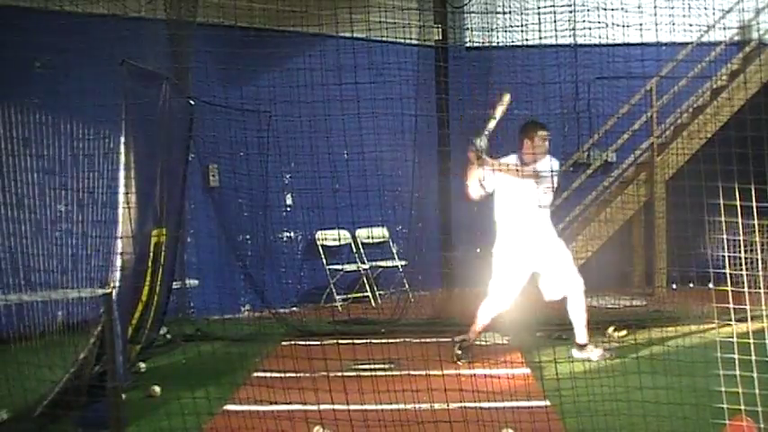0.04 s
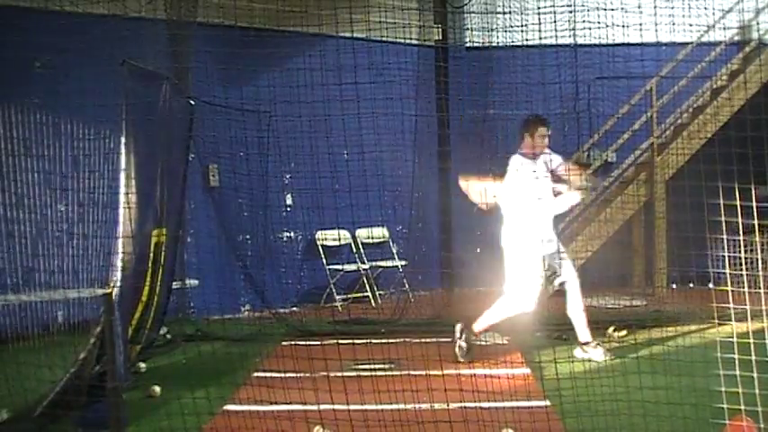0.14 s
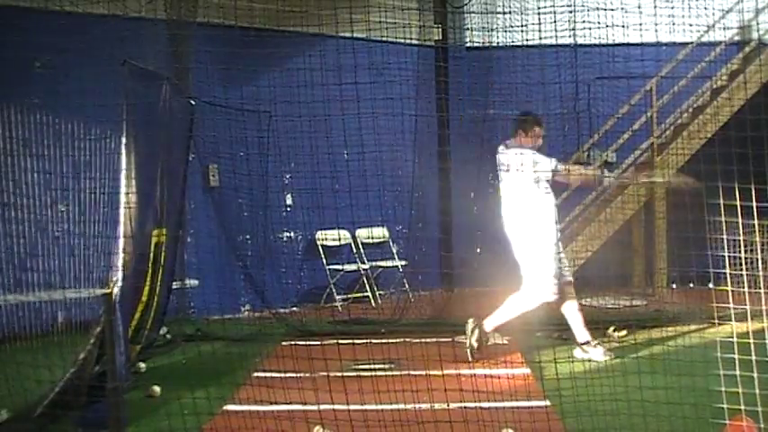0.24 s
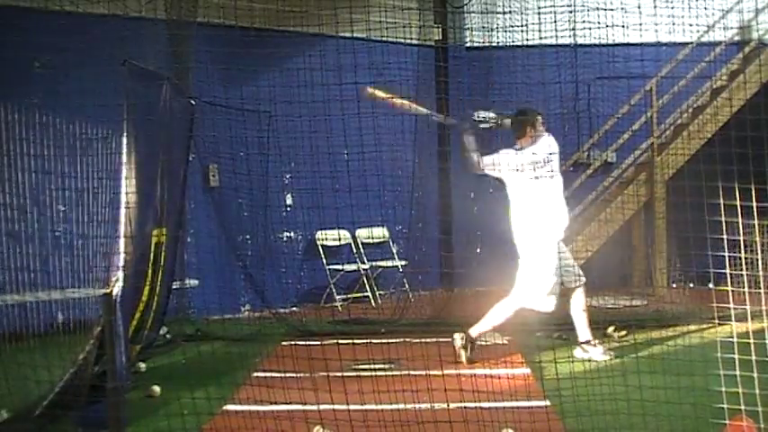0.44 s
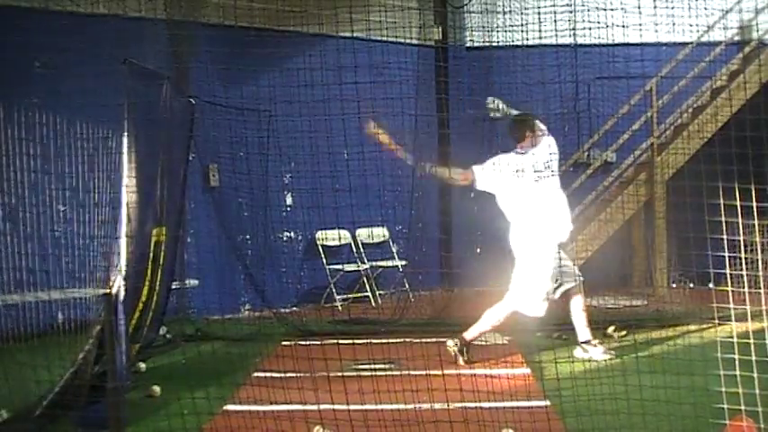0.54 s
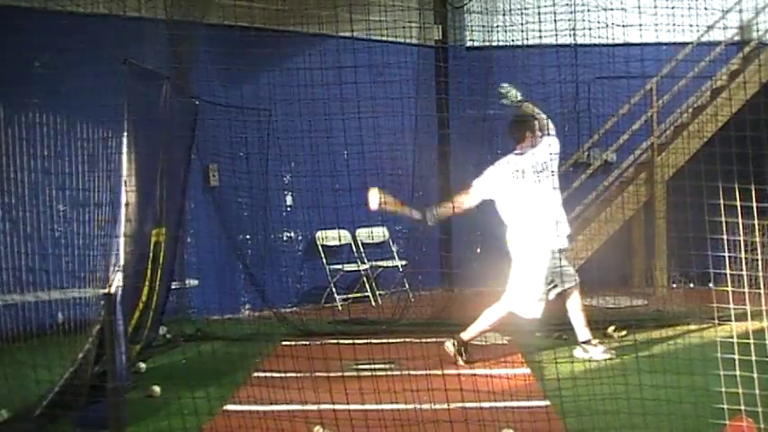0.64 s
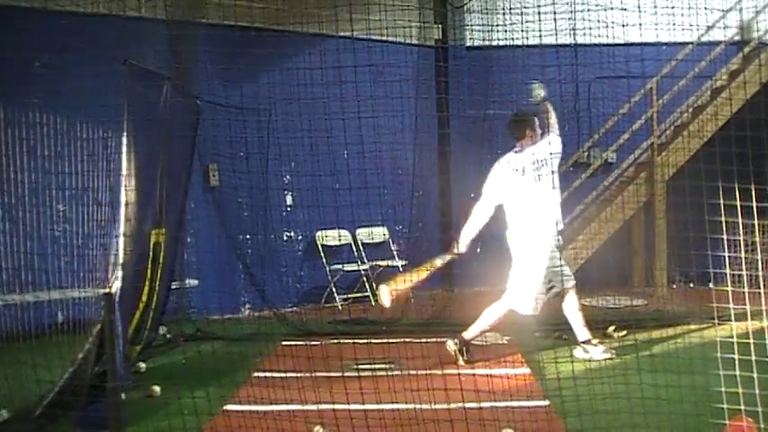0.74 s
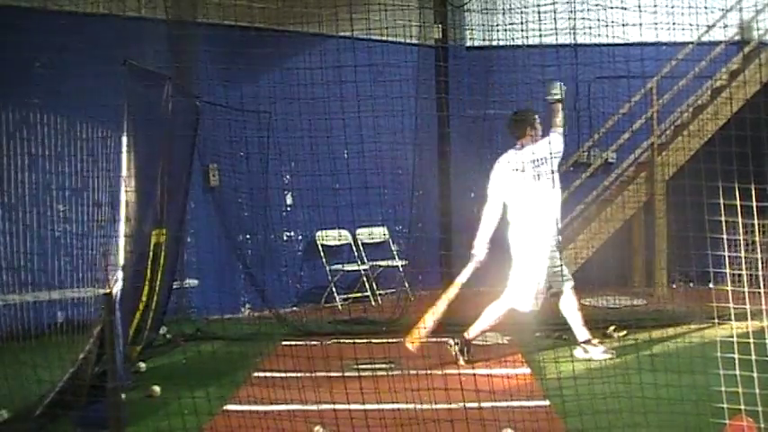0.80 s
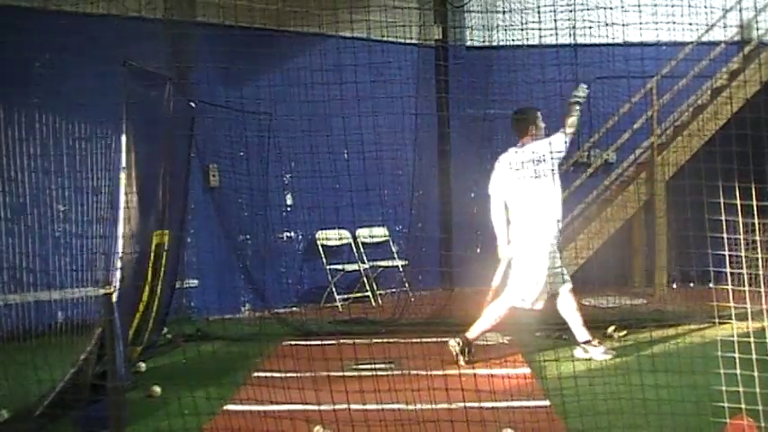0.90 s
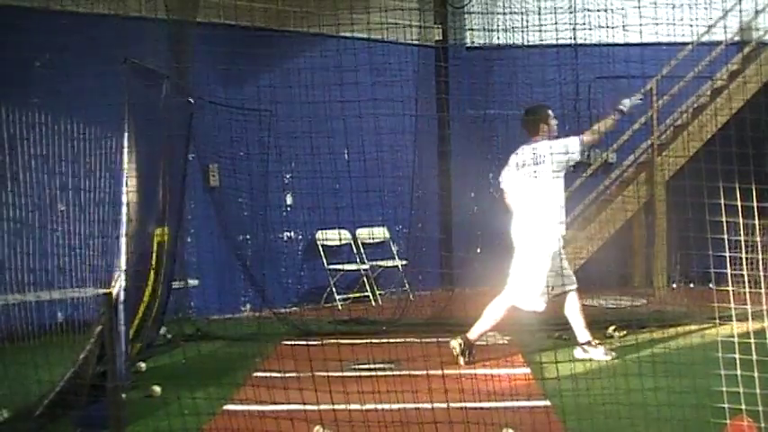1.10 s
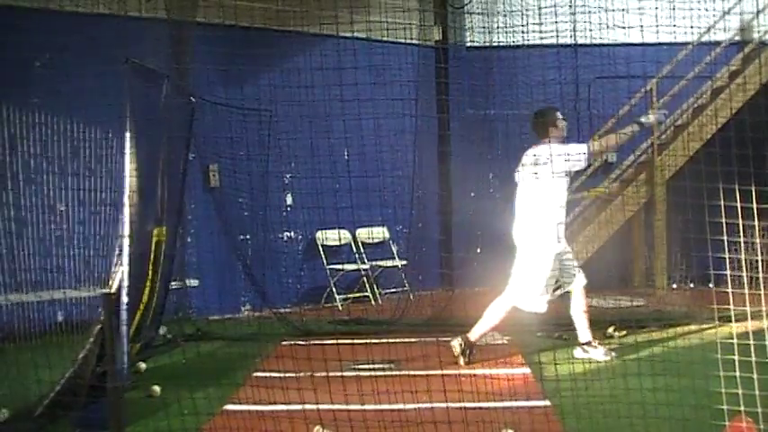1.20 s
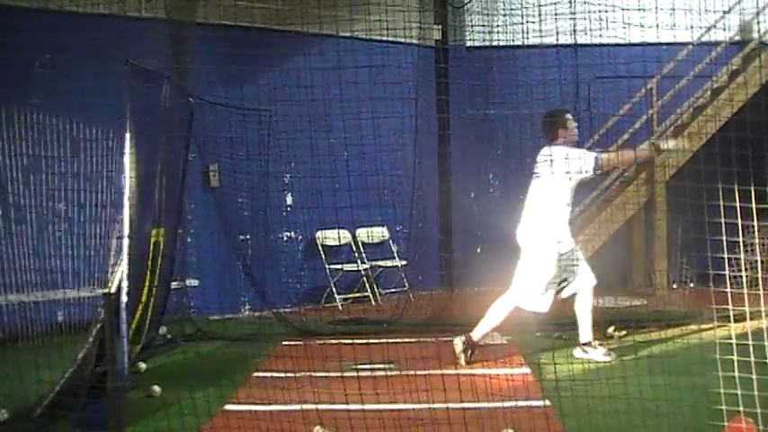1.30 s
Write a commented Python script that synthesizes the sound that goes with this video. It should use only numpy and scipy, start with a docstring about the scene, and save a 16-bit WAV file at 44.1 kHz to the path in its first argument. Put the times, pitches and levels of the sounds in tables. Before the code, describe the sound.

A wooden bat cracks on a ball at about 0.2 s, after a quick swish over faint motor hum and soft hiss. The crack is dry, loud and distorted, with a short low thump and quick close echoes. The hard hall's echo is held up as a long, slowly fading hiss. Near 0.9 s comes a dull, ringing distant thud with light grainy scuffs, then a faint high jingle around 1.1-1.2 s.

```python
"""A large hard hall, one microphone: a faint motor hum over soft hiss, then a bat's swish, shaped noise.
A wooden bat cracks on a ball in a netted cage: damped modes, a low thump, echoes, noise scattered close by.
The crack clips the recorder and ducks its gain; as the gain creeps back it holds the hall's decaying
noise up as a long hiss. Later come a distant ringing thud made of resonant noise, a few light grainy scuffs,
probably shoes on the mat, and a faint jingle of narrow, high noise bands."""
import sys
import numpy as np
from scipy import signal
from scipy.fft import rfft, irfft
from scipy.io import wavfile
from scipy.ndimage import uniform_filter1d

SR = 44100
rng = np.random.default_rng(int(sys.argv[2]) if len(sys.argv) > 2 else 0)


def output_pcm(signal):
    """Save a mono or channel-first signal as 16-bit PCM at the path in sys.argv[1].

    Samples are clipped to [-1, 1] before scaling.
    """
    pcm = np.clip(np.atleast_2d(signal).T, -1, 1) * 32767
    wavfile.write(sys.argv[1], SR, np.round(pcm).astype(np.int16))


N = 59535  # length in samples
HIT_S = .20735  # the moment bat meets ball


def undb(db):
    """Amplitude factor for a level in dB."""
    return 10 ** (np.asarray(db) / 20)


def clock():
    """Time of every sample, s."""
    return np.arange(N) / SR


def bins():
    """Frequency of every spectral bin, Hz, kept above zero for the logarithms."""
    return np.maximum(np.arange(N // 2 + 1) * SR / N, 1)


def along(table, hz):
    """Read a (Hz, value) table on a log-frequency axis."""
    table_hz, values = np.array(table).T
    return np.interp(np.log(hz), np.log(table_hz), values)


def noise(gain):
    """Random-phase noise of rms 1 with the given gain per bin."""
    phases = np.exp(2j * np.pi * rng.random(N // 2 + 1))
    x = irfft(gain * phases, N)
    return x / x.std()


def tinted(table):
    """Noise of rms 1 with a (Hz, dB) colour; only the differences in dB matter."""
    return noise(undb(along(table, bins())))


def resonant(hz, width_hz):
    """Noise of rms 1 in one steep resonance."""
    f = bins()
    detuning = (f / hz - hz / f) * hz / width_hz
    return noise(1 / (1 + detuning ** 2))


def decay(age, t60_s):
    """Exponential decay that falls 60 dB in t60_s."""
    return np.exp(-np.log(1000) * age / t60_s)


def burst(start_s, rise_s, t60_s):
    """Straight rise, then exponential decay."""
    age = clock() - start_s
    return np.clip(age / rise_s, 0, 1) * decay(np.maximum(age - rise_s, 0), t60_s)


# motor hum at the microphone, steady lines: pitch_hz [Hz], level_db [dB rms]
MOTOR_LINES = [(480, -60), (1200, -64), (1860, -61), (1920, -54.5), (2040, -61), (2879, -60.5), (2939, -57),
               (4018, -64)]
# colour of the soft hiss: pitch_hz [Hz], level_db [relative dB per Hz]
AIR_COLOUR = [(30, -48), (70, -28), (140, -9), (280, -6), (500, -2), (1000, 0), (2300, 0), (3000, -3.5),
              (5000, -6), (9500, -6), (12500, -11), (16000, -24)]
AIR_DB = -45.5  # rms


def background():
    """Steady motor lines, sines at random phase, over a soft hiss."""
    hum = 0
    for pitch_hz, level_db in MOTOR_LINES:
        cycles = pitch_hz * clock() + rng.random()
        hum = hum + undb(level_db) * np.sqrt(2) * np.sin(2 * np.pi * cycles)
    return hum + undb(AIR_DB) * tinted(AIR_COLOUR)


# resonances of the thud far down the hall: pitch_hz [Hz], width_hz [Hz], level_db [dB]
THUD_RESONANCES = [(211, 120, -58), (336, 57, -47), (550, 180, -49)]
THUD_S, THUD_RISE_S, THUD_T60_S = .885, 0.027, 1.6


def thud():
    """A dull, ringing knock from far down the hall, probably the ball landing."""
    ring = sum(undb(level_db) * resonant(pitch_hz, width_hz)
               for pitch_hz, width_hz, level_db in THUD_RESONANCES)
    return ring * burst(THUD_S, THUD_RISE_S, THUD_T60_S)


# single shivers: start_s [s], level_db [dB], t60_s [s]
JINGLE_EVENTS = [(1.06, -52, 1), (1.158, -42, 0.034), (1.173, -39, 0.056), (1.185, -55, 1)]
# what each shiver rings with: pitch_hz [Hz], width_hz [Hz], level_db [relative dB]
JINGLE_CLUSTERS = [(6870, 450, 1), (9450, 350, -9), (12300, 450, -10)]


def jingle():
    """Small metal parts, perhaps the net's rings, shiver in a few thin, high clusters."""
    ring = sum(undb(level_db) * resonant(pitch_hz, width_hz)
               for pitch_hz, width_hz, level_db in JINGLE_CLUSTERS)
    swells = sum(undb(level_db) * burst(start_s, .004, t60_s)
                 for start_s, level_db, t60_s in JINGLE_EVENTS)
    return ring * swells


# light rubs: start_s [s], level_db [dB], rise_s [s], decay_s [s to fall to 1/e],
# tilt_db [dB per octave, added to the colour]
SCUFF_EVENTS = [(.886, -34, 0.011, 0.028, 6), (0.924, -35, 0.0088, 0.057, 1), (1.042, -40, .012, 0.053, 4),
                (1.062, -36.5, 0.0073, 0.027, -4), (1.09, -42, 0.02, .07, -1),
                (1.165, -42.5, 0.0092, .05, -5)]
# colour shared by the rubs before tilt: pitch_hz [Hz], level_db [relative dB per Hz]
SCUFF_COLOUR = [(1000, -14), (4000, -7), (7000, 4.5), (9500, 2), (12300, -0.5), (13300, -8), (16000, -17)]
SCUFF_GRAIN_DB = 2  # rms wander of the level


def scuffs():
    """Short grainy rubs, probably shoes on the mat, the first the brightest."""
    out = 0
    lowest_hz, pivot_hz = SCUFF_COLOUR[0][0], SCUFF_COLOUR[2][0]
    for start_s, level_db, rise_s, decay_s, tilt_db in SCUFF_EVENTS:
        colour_db = along(SCUFF_COLOUR, bins()) + tilt_db * np.log2(bins() / pivot_hz)
        bass_cut = np.minimum(bins() / lowest_hz, 1) ** 2
        rub = noise(undb(colour_db) * bass_cut)
        grain = uniform_filter1d(rng.standard_normal(N), size=60)
        rub = rub * undb(SCUFF_GRAIN_DB * grain / grain.std())
        envelope = burst(start_s, rise_s, decay_s * np.log(1000))  # 1/e time to t60
        out = out + undb(level_db) * rub / rub.std() * envelope
    return out


# colour of the hall's echo as it starts: pitch_hz [Hz], level_db [relative dB per Hz]
HALL_COLOUR = [(60, -80), (110, -55), (200, -39), (315, -29), (400, -21), (560, -9.5), (720, -8), (930, -6),
               (1170, -5.5), (1450, -1), (1760, -5.5), (2270, -3.5), (3300, -6), (5190, -8.5),
               (9820, -10.5), (11600, -14.5), (16000, -37)]
# how long the hall rings: pitch_hz [Hz], t60_s [s]
HALL_DECAY = [(150, 2.07), (500, 1.46), (1500, 1.52), (3300, 1.387), (5800, 1.176), (8200, 0.88),
              (11000, 0.8), (15000, 0.84)]
# bat notes that linger in the hall: pitch_hz [Hz], width_hz [Hz], level_db [dB]
LINGERING_NOTES = [(973, 190, -9), (1464, 130, -11)]
HALL_DB, HALL_DELAY_S, HALL_RISE_S = 3.5, 0.02, 0.0028
NOTE_T60_S = 1.34


def hall():
    """Dense echo from the far walls; the treble dies first and the bat's low notes linger."""
    start_s = HIT_S + HALL_DELAY_S
    wash_spectrum = rfft(tinted(HALL_COLOUR))
    centres_hz = np.geomspace(100, 16000, 20)
    wash = 0
    # overlapping triangular bands that add up to the whole wash, each with its own decay
    for centre_hz, peak in zip(centres_hz, np.eye(len(centres_hz))):
        share = np.interp(np.log(bins()), np.log(centres_hz), peak)
        band = irfft(wash_spectrum * share, N)
        wash = wash + band * burst(start_s, HALL_RISE_S, along(HALL_DECAY, centre_hz))
    notes = sum(undb(level_db) * resonant(pitch_hz, width_hz)
                for pitch_hz, width_hz, level_db in LINGERING_NOTES)
    return undb(HALL_DB) * wash + notes * burst(start_s, HALL_RISE_S, NOTE_T60_S)


# colour of the air round the swinging bat: pitch_hz [Hz], level_db [relative dB per Hz]
SWISH_COLOUR = [(100, -20), (450, -2), (1500, 0), (4000, -5), (10000, -5), (16000, -21)]
SWISH_DB, SWISH_RISE_S = -37, 0.034  # rise by a factor e, and the same for the fall


def swish():
    """Rushing air swells as the bat speeds up to the ball, then fades as it swelled."""
    swell = np.exp(-abs(clock() - HIT_S) / SWISH_RISE_S)
    return undb(SWISH_DB) * tinted(SWISH_COLOUR) * swell


THUMP_HZ, THUMP_DB, THUMP_T60_S = 100, 5.5, 0.0077


def thump():
    """A short, low thump under the crack, as when an overloaded input lurches: one damped sine."""
    age = np.maximum(clock() - HIT_S, 0)
    return undb(THUMP_DB) * np.sin(2 * np.pi * THUMP_HZ * age) * decay(age, THUMP_T60_S)


# modes of bat and ball: pitch_hz [Hz], level_db [relative dB], t60_s [s]
BAT_MODES = [(580, -14.5, 0.011), (975, -20.5, 0.007), (1444, -11.5, 0.011), (2355, -7.5, 0.0052),
             (3010, 0, 0.0034), (4550, -3.5, .0018), (5600, -7, .0037), (8180, -1.5, 0.0014),
             (11160, -5.5, .0013)]
HIT_DB, CONTACT_S = 30.5, .00007


def crack(start_s):
    """The brief contact rings the heavily damped modes of bat and ball, neighbours in opposite sense."""
    age = np.maximum(clock() - start_s, 0)
    ring = 0
    for k, (pitch_hz, level_db, t60_s) in enumerate(BAT_MODES):
        mode = undb(level_db) * np.sin(2 * np.pi * pitch_hz * age) * decay(age, t60_s)
        ring = ring + (-1) ** k * mode
    onset = 1 - np.exp(-age / CONTACT_S)
    return undb(HIT_DB) * ring * onset


# single echoes from floor and walls: delay_s [s], level_db [dB relative to the crack]
CRACK_ECHOES = [(.001378, -10), (0.0158, -29), (0.019, -14), (.0229, -19), (0.026, -23), (.029, -20),
                (.066, -22.5), (.133, -19)]
# scatter from the cage close by: pitch_hz [Hz], level_db [relative dB per Hz]
CAGE_COLOUR = [(150, -28), (500, -10), (1000, 3), (1500, -3), (2500, -12), (5000, -17), (10000, -14),
               (16000, -32)]
CAGE_DB, CAGE_T60_S = 7, 0.059
# scatter from the nearest walls: pitch_hz [Hz], level_db [relative dB per Hz]
WALL_COLOUR = [(300, -25), (1200, -2), (3000, -18), (6300, 4.5), (8000, -6), (10500, 0.5), (13000, -10),
               (16000, -26)]
WALLS_DB, WALLS_DELAY_S, WALLS_RISE_S, WALLS_T60_S = 1.5, 0.013, 0.013, 0.052
LOW_CUT_HZ = 354  # the microphone's low cut, on the hit and its close echoes


def hit():
    """The crack, its single echoes, and scatter from the cage and nearest walls as short noise bursts."""
    echoes = sum(undb(level_db) * crack(HIT_S + delay_s) for delay_s, level_db in CRACK_ECHOES)
    cage = undb(CAGE_DB) * tinted(CAGE_COLOUR) * burst(HIT_S, 0.0018, CAGE_T60_S)
    wall_envelope = burst(HIT_S + WALLS_DELAY_S, WALLS_RISE_S, WALLS_T60_S)
    walls = undb(WALLS_DB) * tinted(WALL_COLOUR) * wall_envelope
    low_cut = signal.butter(4, LOW_CUT_HZ, "high", fs=SR, output="sos")
    # the tiny offset keeps the filter clear of vanishingly small numbers
    return signal.sosfilt(low_cut, crack(HIT_S) + echoes + cage + walls + 1e-18)


def scene():
    """Everything reaches one microphone, feeding two identical channels."""
    distant = background() + thud() + hall()
    close = jingle() + scuffs() + swish() + thump() + hit()
    mono = distant + close
    return np.array([mono, mono])


OVERLOAD_DB, CEILING_DB = 26.5, 0  # input clipping; level above which the gain ducks
RELEASE_DB_PER_S, TOP_HZ = 34.5, 16200  # gain recovery; top of the recorded band


def record(dry):
    """The input clips on the crack; gain control ducks at once and recovers at a steady rate."""
    clipped = np.clip(dry, -undb(OVERLOAD_DB), undb(OVERLOAD_DB))
    peak_db = 20 * np.log10(abs(clipped).max(axis=0) + 1e-9)
    over_db = np.maximum(peak_db - CEILING_DB, 0)
    # the deepest past overload still in force, less what the gain has recovered since
    recovered_db = RELEASE_DB_PER_S * clock()
    duck_db = np.maximum.accumulate(over_db + recovered_db) - recovered_db
    top_cut = signal.ellip(8, .2, 70, TOP_HZ, fs=SR, output="sos")
    return signal.sosfilt(top_cut, clipped * undb(-duck_db))


dry = scene()
out = record(dry)
output_pcm(out)
```